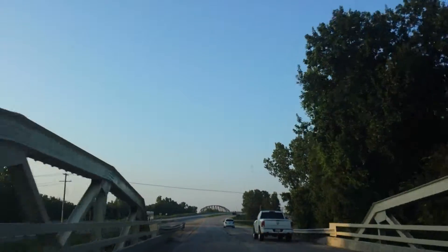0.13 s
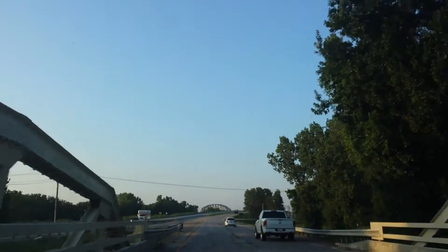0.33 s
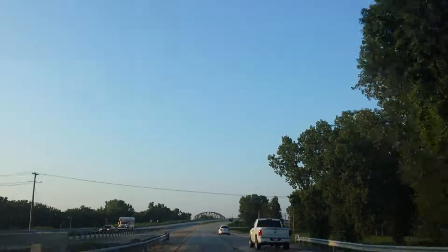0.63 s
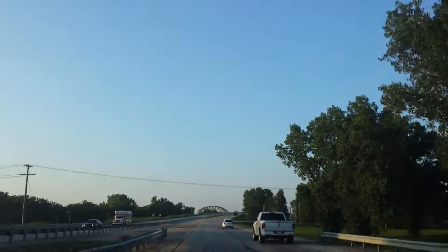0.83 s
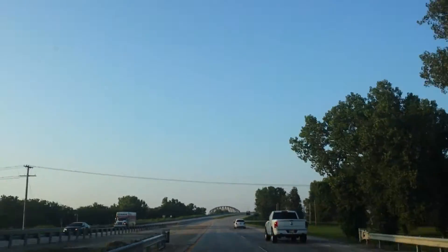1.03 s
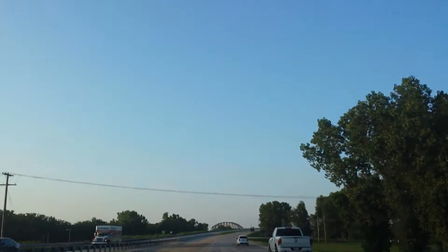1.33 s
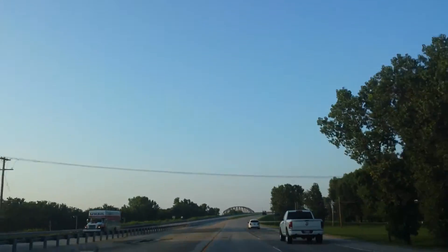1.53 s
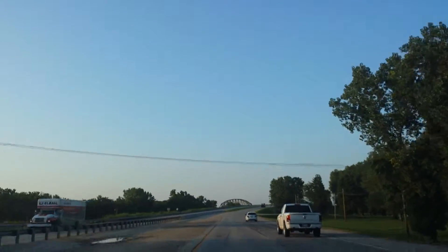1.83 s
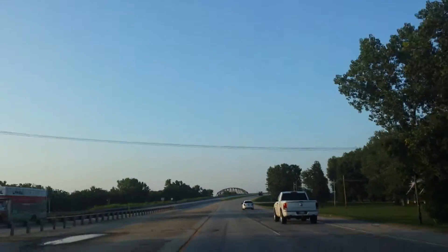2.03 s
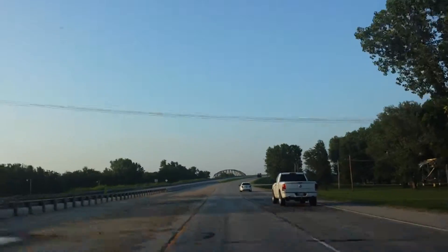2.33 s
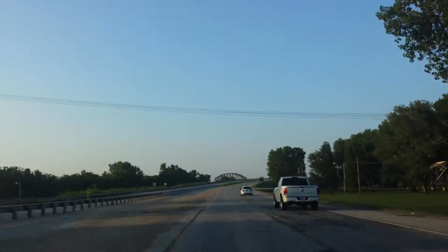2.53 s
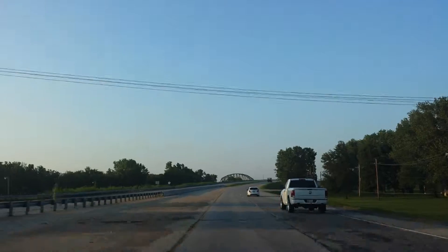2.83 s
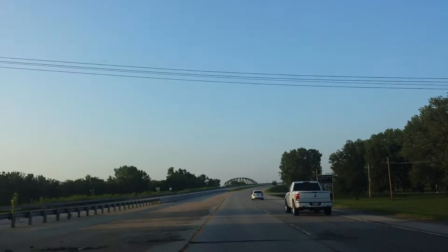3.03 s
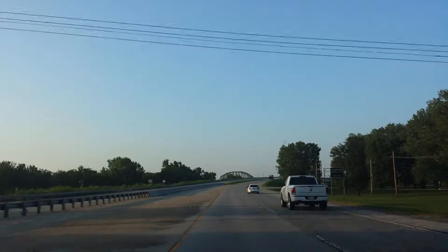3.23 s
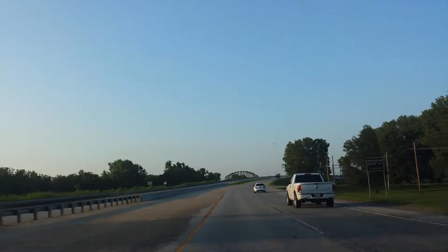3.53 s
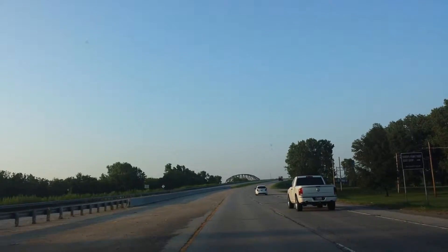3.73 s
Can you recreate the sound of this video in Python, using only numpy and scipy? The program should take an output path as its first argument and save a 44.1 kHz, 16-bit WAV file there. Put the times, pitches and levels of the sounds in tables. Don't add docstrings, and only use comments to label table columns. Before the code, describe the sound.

Steady low road rumble inside a moving car, with bumps and loose metal bits ticking

```python
import sys
import numpy as np
from scipy import signal
from scipy.fft import rfft, irfft, next_fast_len
from scipy.io import wavfile
from scipy.ndimage import uniform_filter1d

SR = 44100
rng = np.random.default_rng(int(sys.argv[2]) if len(sys.argv) > 2 else 0)


def store_pcm(level_fs):
    pcm = np.round(np.clip(level_fs, -1, 1) * 32767).astype(np.int16)
    wavfile.write(sys.argv[1], SR, np.atleast_2d(pcm).T)


def volts(x):
    e = np.asarray(x, float) / 20
    return 10 ** e


N = 171549
T = np.arange(N) / SR


def evened(x):
    return x / np.sqrt(np.mean(x ** 2) + 1e-20)


def read(points, hz):
    f, value = np.transpose(points)
    return np.interp(np.log(hz + 1), np.log(f + 1), value)


def control(rows, column):
    rows = np.array(rows)
    return volts(np.interp(T, rows[:, 0], rows[:, column]))


# f/Hz, level/dB
PAIR_LEAN = [(100, -1), (400, 1), (700, -1.5), (1500, 6.5), (4000, -1.5), (6000, 5), (7800, -7),
             (12000, -3)]


def colour(x, points):
    size = next_fast_len(N + 4096)
    hz = np.fft.rfftfreq(size, 1 / SR)
    half_lean = np.array([[.5], [-.5]]) * read(PAIR_LEAN, hz)
    gain = volts(read(points, hz) + half_lean)
    return irfft(rfft(x, size) * gain, size)[:, :N]


# f/Hz, coherence/1
PAIR_COHERENCE = [(30, 0.86), (60, 0.91), (150, 0.98), (380, 0.77), (950, 0.019), (2380, -0.031),
                  (5980, -0.076), (15000, 0.04)]


def noise(points, patchy_db, flicker_db, size, modes=()):
    frames = 4 * N // size + 8
    hz = np.fft.rfftfreq(size, 1 / SR)
    a, b, c, d, patch = rng.standard_normal((frames, len(hz), 5)).T
    patch = uniform_filter1d(patch, size=7, axis=0)
    patch = evened(uniform_filter1d(patch, size=9, axis=1))
    flicker = evened(uniform_filter1d(rng.standard_normal(frames), size=3))

    same = np.clip(read(PAIR_COHERENCE, hz), -1, 1)[:, None]
    left = a + 1j * b
    right = same * left + np.sqrt(1 - same ** 2) * (c + 1j * d)

    lift = np.ones(len(hz))
    for f, width, db in modes:
        lift = lift + volts(db - 2.5) / np.sqrt(1 + (2 * (hz - f) / width) ** 2)
    z = np.array([left, right]) * volts(patchy_db * patch + flicker_db * flicker) * lift[:, None]
    sound = signal.istft(z, nperseg=size, noverlap=size * 3 // 4)[1][:, :N]
    return evened(colour(sound, points))


def strikes(rows, rise_s, t60, hold_s=0):
    out = np.zeros(N)
    for s, db, _ in rows:
        t = np.maximum(T - s, 0)
        decay_db = 60 * np.maximum(t - hold_s, 0) / t60
        out += volts(db - decay_db) * np.minimum(t / rise_s, 1)
    return out


def rings(rows, t60, detune):
    length = 8000
    out = np.zeros((2, N + length))
    t = np.arange(length) / SR
    for s, db, hz in rows:
        phase, upper_phase = rng.random((2, 2, 1))
        pair = np.sin(2 * np.pi * (hz * t + phase))
        pair = pair + 1.23 * np.sin(2 * np.pi * (hz * detune * t + upper_phase))
        start = round(s * SR)
        out[:, start:start + length] += volts(db - 60 * t / t60) * np.minimum(t / 0.00062, 1) * pair
    return out[:, :N]


def metal(x):
    hz = np.fft.rfftfreq(N, 1 / SR)
    modes = evened(uniform_filter1d(rng.standard_normal(len(hz)), size=100))
    modes = modes * np.clip(hz / 10000, 0, 1) ** 2
    return evened(irfft(rfft(x) * volts(2.8 * modes), N))


def clatter(per_s, spread_db):
    hit = (rng.random(N) < per_s / SR) * volts(spread_db * np.minimum(rng.exponential(1, N), 4))
    return hit * rng.standard_normal((2, N)) + 0.7 * rng.standard_normal((2, N))


def steadied(x):
    power = uniform_filter1d((x ** 2).mean(0), round(.09 * SR))
    return evened(x / (np.abs(power) + .05) ** 0.35)


# t/s, shake level/dB, tyre roar level/dB
ROAD = [(0, -13, -38), (.16, -17, -31), (.3, -17.5, -33.5), (.47, -16, -33.5), (.6, -15.5, -33),
        (1.062, -18, -34), (1.075, -11.5, -32.5), (1.3, -12.5, -35), (1.55, -15, -37), (1.71, -13, -33),
        (1.88, -11.5, -34.5), (2, -15, -31.5), (2.72, -16.5, -29.5), (2.96, -15, -33.5), (3.25, -16, -32.5),
        (3.42, -18.5, -31.5), (3.73, -14, -33.5), (3.89, -17.5, -32.5)]
# f/Hz, level/dB
BOOM = [(12, -38), (20, -16), (70, -2.5), (114, -3.5), (195, -6), (276, -11.5), (343, -23), (431, -16.5),
        (500, -28.5), (650, -47), (1100, -120)]
# f/Hz, width/Hz, level/dB
CABIN_MODES = [(45, 14, -26), (78.3, 9.8, 3.5), (116.3, 15, 2.5), (156, 44, -5.5), (180, 11.4, -2),
               (317, 5.5, 0.5), (405, 85, -17)]


def boom():
    shaken = noise(BOOM, 1.26, 0.72, size=2048, modes=CABIN_MODES)
    return control(ROAD, column=1) * steadied(shaken)


# f/Hz, level/dB
ROAR = [(180, -37), (300, -1), (345, -4.5), (429, -7), (521, -11), (877, -8.5), (1590, -19), (3080, -33),
        (4000, -43), (5200, -46), (8800, -120)]
# f/Hz, width/Hz, level/dB
TRIM_MODES = [(442.6, 20, 2.5), (697, 19, 3), (885, 27, -5)]


def roar():
    road_share, air_db = 0.12, -32.5
    x = noise(ROAR, 1.1, 1.0, size=1024, modes=TRIM_MODES)
    low = signal.sosfiltfilt(signal.butter(2, 1460, fs=SR, output="sos"), x)
    level = control(ROAD, column=2)
    air_level = level ** road_share * volts(air_db) ** (1 - road_share)
    return volts(3.5) * (level * low + air_level * (x - low))


# t/s, level/dB
HISS_LEVEL = [(0, -32.5), (.3, -37.5), (.4, -39.5), (1.05, -40), (1.2, -40.5), (2.2, -40), (2.7, -42),
              (3.2, -41), (3.89, -41.5)]
# f/Hz, level/dB
HISS = [(1650, 6), (2800, 1), (3700, -3), (5610, 1), (7060, -1), (9400, -11.5), (12700, -17), (14700, -21),
        (15500, -42)]


def hiss():
    return control(HISS_LEVEL, column=1) * metal(noise(HISS, 1.44, 0.47, size=256))


# t/s, level/dB
DECK = [
    (0, -32),
    (1, -21.5),
    (1.3, -21),
    (2, -25.5),
    (2.4, -39),
    (3.6, -35),
    (3.76, -21),
]
# f/Hz, level/dB
SHUDDER = [(12, -28), (22, -10), (45, -3), (65, -20), (120, -90)]


def shudder():
    return control(DECK, column=1) * noise(SHUDDER, 1.0, .5, size=2048).mean(0)


# middle t/s, half width/s, level/dB, f/Hz
SURGES = [(0.072, .05, -19, 72.5), (0.129, 0.026, -7, 128), (0.178, 0.048, -10.5, 104.5),
          (0.482, 0.034, -12, 110), (1.179, 0.023, -10.5, 131), (1.209, 0.061, -13, 62),
          (1.31, 0.082, -9.5, 86.2), (1.411, 0.067, -14.5, 111.3), (1.66, 0.066, -11, 147.8),
          (1.729, 0.05, -8, 77), (1.85, 0.076, -12, 114.7), (2.22, 0.072, -14.5, 104),
          (2.881, 0.048, -13.5, 76.4), (3.0, 0.13, -11, 111.4), (3.28, 0.095, -14.5, 115.5),
          (3.65, 0.061, -12, 79.7), (3.74, 0.046, -7.5, 107.5), (0.751, .05, -15.5, 124),
          (1.0, 0.041, -19.5, 73.5), (1.101, 0.034, -12.5, 75.4), (1.96, .04, -16, 99.6),
          (2.0, 0.048, -17.5, 187), (2.4, 0.11, -20, 180), (2.819, 0.034, -12.5, 118.7),
          (3.15, 0.045, -12, 82.6)]


def surges():
    out = np.zeros(N)
    for s, half, db, hz in SURGES:
        turn, bend = rng.random(2)
        t = T - s
        turns = hz * t + 60 * (bend - .5) * t ** 2 + turn
        out += volts(db) * np.exp(-(t / half) ** 2) * np.sin(2 * np.pi * turns)
    return out


# t/s, peak level/dB, ring f/Hz
THUMPS = [
    (.017, -23, 715),
    (.449, -28, 800),
    (1.068, -17, 620),
    (1.915, -21, 1000),
    (2.04, -23, 700),
    (2.052, -23, 800),
    (2.361, -25, 800),
    (2.801, -28, 760),
]
# f/Hz, level/dB
KNOCK = [(250, -10), (450, -6), (750, 3), (950, -4.5), (1400, -21), (2500, -53)]


def thumps():
    burst = strikes(THUMPS, 0.0039, 0.21) * noise(KNOCK, 1.0, 0.44, size=256)
    return volts(-3.5) * (burst + volts(-7) * rings(THUMPS, .09, 1.25))


# t/s, peak level/dB, ring f/Hz
TICKS = [(.0482, -30, 6000), (.0505, -26, 8200), (.0528, -23, 5900), (.0685, -31, 6900), (.0785, -13, 6600),
         (.085, -28, 7500), (.1295, -19, 7400), (.1325, -22, 4700), (.19, -34, 8400), (1.909, -31, 7540),
         (3.59, -44, 9000)]
# f/Hz, level/dB
TICK = [(1470, -39), (2500, -4.5), (4330, -8.5), (6450, 4.5), (9030, -11), (10000, -6), (15500, -31)]


def ticks():
    rise_s, t60 = .0002, .012
    burst = strikes(TICKS, rise_s, t60) * noise(TICK, 1.4, .1, size=256)
    return volts(-2) * (burst + volts(-6) * rings(TICKS, t60, 1.25))


# middle t/s, half width/s, level/dB
SLIDES = [
    (.1, 0.052, -37),
    (.2, 0.1, -48),
    (1.27, 0.17, -44),
    (3.35, 0.067, -41.5),
    (3.38, 0.11, -44),
]
# f/Hz, level/dB
SLIDE = [(2500, -22), (4200, -7.5), (5500, -4), (7300, 0.5), (9000, -10), (12000, -16.5), (14500, -17),
         (15600, -30)]


def slides():
    sweep = np.zeros(N)
    for s, half, db in SLIDES:
        sweep += volts(db) * np.exp(-np.abs((T - s) / half) ** 2.7)
    return sweep * metal(colour(clatter(9000, 1.1), SLIDE))


# t/s, peak level/dB, ring f/Hz
RATTLES_FIRST = [(0.2831, -33, 5810), (0.4158, -50, 5520), (0.549, -33, 5500), (0.6084, -38, 5880),
                 (.7492, -38, 9070), (1.0025, -36.5, 6140), (1.1048, -30, 5510), (1.2001, -29.5, 7150),
                 (1.2355, -29, 4340), (1.3043, -33, 5790), (1.336, -31, 6910), (1.4166, -32.5, 7190),
                 (1.4721, -37, 9500), (1.528, -34, 4620), (1.6081, -31.5, 4950), (1.6715, -30.5, 4970),
                 (1.7235, -33, 7410), (1.8172, -39, 6000), (1.8655, -37, 5690), (1.91, -27, 5390),
                 (1.9434, -31, 4480), (1.9823, -32, 4960), (2.1195, -27.5, 7040), (2.1499, -33, 8080),
                 (2.1803, -34.5, 4550)]
# t/s, peak level/dB, ring f/Hz
RATTLES_SECOND = [(2.3301, -39, 6000), (2.427, -37, 4590), (2.589, -30.5, 5700), (2.8, -32.5, 5500),
                  (2.8481, -33, 4290), (2.888, -33, 5170), (2.9279, -30, 7700), (2.9693, -31.5, 6600),
                  (3.017, -34, 4450), (3.0676, -30.5, 4470), (3.0996, -29.5, 4450), (3.149, -30.5, 4300),
                  (3.1987, -34, 8200), (3.2387, -31, 4170), (3.2845, -31, 7220), (3.335, -29, 6330),
                  (3.3679, -36, 7300), (3.6374, -31.5, 6900), (3.6642, -39, 5570), (3.731, -30.5, 4500),
                  (3.764, -29, 4240), (3.8207, -36, 5200), (3.8743, -33.5, 7430)]
# f/Hz, level/dB
CHINK = [(1650, 1), (2800, -8.5), (3120, -10), (4560, 2.5), (6160, -2), (7640, -1), (11000, -11.5),
         (12100, -13.5), (15500, -21)]


def rattles():
    rows = RATTLES_FIRST + RATTLES_SECOND
    t60 = .09
    chinks = metal(colour(clatter(3000, 3.8), CHINK))
    bounced = strikes(rows, .0015, t60, hold_s=.009) * chinks
    return volts(-9) * (bounced + volts(-8) * rings(rows, .05, 1.05))


def cabin(x):
    t = np.arange(6000) / SR
    taps = rng.standard_normal((2, 6000)) * (rng.random((2, 6000)) < .1)
    taps = taps * volts(-60 * t / .07) * (t > .002)
    taps = taps / np.linalg.norm(taps[0])
    return x + volts(-8) * signal.fftconvolve(x, taps, axes=1)[:, :N]


# t/s, level/dB, f/Hz
JOLTS = [
    (1.071, -5, 100),
    (1.069, -13, 230),
    (1.068, -21, 420),
    (1.62, -13, 145),
    (2.8, -15, 112),
]


def jolts():
    out = np.zeros(N)
    for s, db, hz in JOLTS:
        t = np.maximum(T - s, 0)
        out += volts(db - 60 * t / .16) * np.sin(2 * np.pi * hz * t)
    return out


# t/s, peak level/dB, f/Hz
PINGS = [(1.548, -55, 9960), (1.604, -47, 4900), (1.609, -46, 7000), (1.672, -46, 7400), (1.676, -44, 4800),
         (1.7235, -55, 15350), (1.724, -47, 4950), (1.726, -47, 7500), (2.98, -50, 6500),
         (3.02, -52, 10000), (3.176, -44, 7300)]


def pings():
    grit = 1 + .9 * evened(uniform_filter1d(rng.standard_normal((2, N)), size=50))
    tones = np.zeros(N)
    for row in PINGS:
        turn = rng.random() / 4
        tones += strikes([row], 0.0039, .04, hold_s=.012) * np.sin(2 * np.pi * (row[2] * T + turn))
    return grit * tones


def scene():
    driving = boom() + roar() + hiss() + shudder() + surges()
    tray = cabin(ticks() + rattles()) + slides()
    return driving + thumps() + tray + jolts() + pings()


def gate(x):
    hz, _, z = signal.stft(x, SR, nperseg=1024)
    power = np.abs(z) ** 2
    near = uniform_filter1d(uniform_filter1d(power, size=31, axis=1), size=5, axis=2)
    near = near * volts(2 * 0.1) + 1e-20
    depth = .85 * np.clip(hz / 13000, 0, 1)[:, None] ** 2
    gain = (2 * power / (power + near) + 1e-6) ** depth
    return signal.istft(z * gain, SR, nperseg=1024)[1][:, :N]


def roll_off(x):
    return signal.sosfilt(signal.butter(12, 15790, fs=SR, output="sos"), x)


def record(dry):
    soft = dry / (1 + (dry / 1.05) ** 4) ** .25
    edge = signal.firwin(511, 15700, window=("kaiser", 9), fs=SR)[None]
    mix = signal.oaconvolve(gate(soft), edge, "same")
    return roll_off(mix)


dry = scene()
out = record(dry)
store_pcm(out)
```